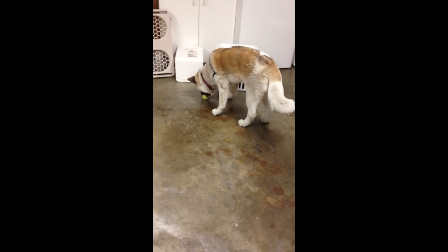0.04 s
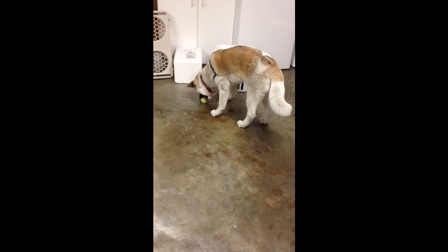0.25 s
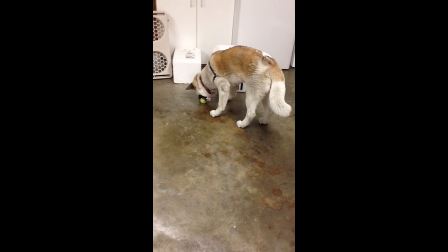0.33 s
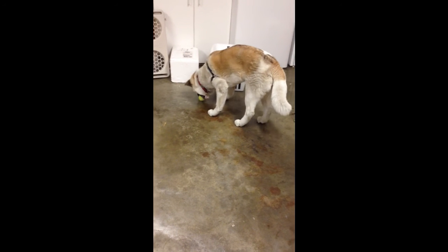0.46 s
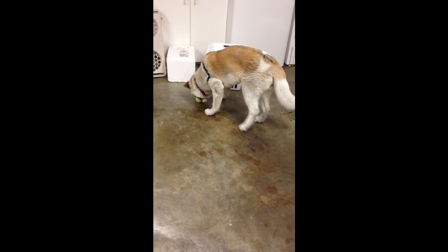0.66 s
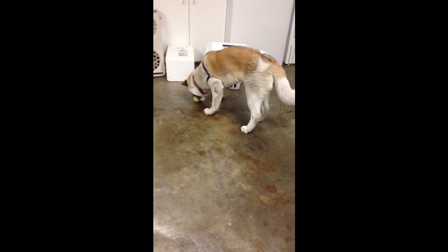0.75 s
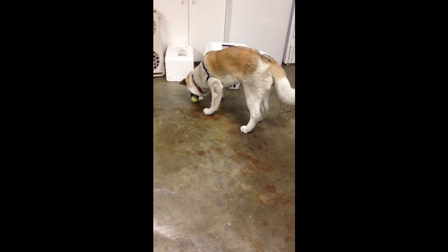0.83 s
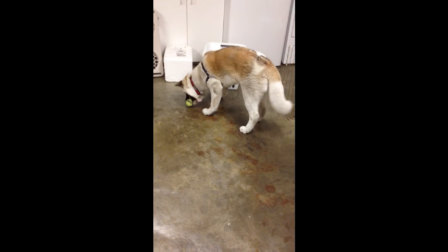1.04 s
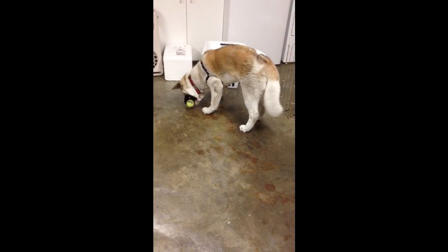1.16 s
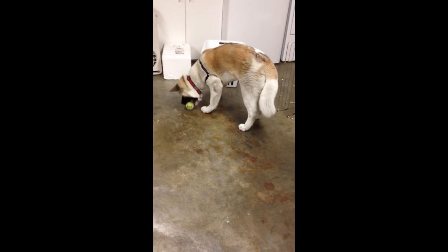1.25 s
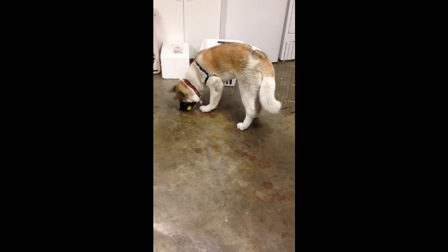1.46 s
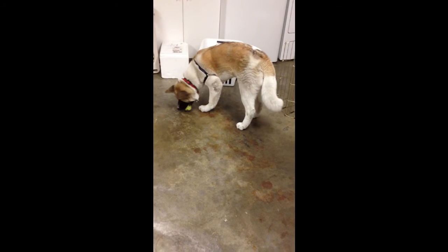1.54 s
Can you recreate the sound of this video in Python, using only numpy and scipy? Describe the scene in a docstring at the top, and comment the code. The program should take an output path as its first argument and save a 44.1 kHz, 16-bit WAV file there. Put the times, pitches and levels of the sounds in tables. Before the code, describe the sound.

Squeaky toy ball chewed by a dog: one short squeak, a longer one that rises and falls, then three quick ones, the fourth loudest. Lively hard room, faint low fan, slight early hiss, distant phone microphone.

```python
"""Five squeaks from a rubber ball a dog bites in a bare hard-floored room, a few metres from a phone.
Each bite drives air through the squeaker reed: a stack of clean overtones whose pitch follows the
pressure, with a little leaking air. The room rings on as filtered noise that dies band by band.
Behind it a fan drones low with a faint hum, and a thin treble hiss with a faint tone fades early."""
import sys
import numpy as np
from scipy import signal
from scipy.fft import rfft, irfft
from scipy.io import wavfile
from scipy.ndimage import uniform_filter1d

SR = 44100
rng = np.random.default_rng(int(sys.argv[2]) if len(sys.argv) > 2 else 0)


def wrap_up_sound(samples):
    """Save the sound to the file named by the first command line argument, as 16-bit audio."""
    columns = np.atleast_2d(samples).T
    # keep every value between -1 and 1, then stretch to whole-number steps
    tamed = np.clip(columns, -1, 1)
    steps = np.round(tamed * 32767).astype(np.int16)
    wavfile.write(sys.argv[1], SR, steps)


def elevation(decibels):
    """Turn decibel levels (scalar or array-like) into linear amplitude ratios."""
    levels = np.asarray(decibels, float)
    return 10 ** (levels / 20)


N = 70560  # samples, 1.6 s


def unit(x):
    """Scale to an rms of 1."""
    return x / np.sqrt(np.mean(x ** 2))


def colour(x, table):
    """Filter by (Hz, dB) points, joined by straight lines over log frequency."""
    hz = np.maximum(np.arange(len(x) // 2 + 1) * SR / len(x), 1)
    f, db = np.array(table, float).T
    return irfft(rfft(x) * elevation(np.interp(np.log(hz), np.log(f), db)), len(x))


def walk(rate):
    """Random levels held 1 / rate s and slewed twice; spread near 1."""
    k = int(SR / rate)
    held = np.repeat(rng.standard_normal(N // k + 1), k)
    return 1.3 * uniform_filter1d(uniform_filter1d(held, k), k)[:N]


def fan(t):
    """Low drone: steady shaped noise plus one hum tone, both wavering slowly in level."""
    # Spectrum of the fan in the room: f/Hz, level/dB per Hz
    fan_spectrum = [(20, -15), (60, -19), (110, -6), (200, 0.5), (320, -1), (550, -4), (1000, -10),
                    (1600, -12.5), (3000, -15), (6000, -19.5), (12000, -27), (16000, -26)]
    drone_db, hum_db, hum_hz = -56, -69.5, 307
    drone = elevation(drone_db + 0.68 * walk(6.2)) * unit(colour(rng.standard_normal(N), fan_spectrum))
    hum = elevation(hum_db + 2.6 * walk(6.4)) * np.sin(2 * np.pi * hum_hz * t)
    return drone + hum


def treble_hiss(t):
    """Thin shaped noise and a faint unsteady tone inside it, both sinking and then gone early."""
    # Spectrum of the hiss: f/Hz, level/dB per Hz
    hiss_spectrum = [(1000, -25), (2000, -19.5), (3600, -12.5), (5200, -21), (7000, -5.5), (7800, 9.5),
                     (11000, -1.5), (14500, -12), (16000, -16)]
    start_db, slope_db_s = -54.46, -25
    ring_hz, ring_db, ring_t60_s = 7780, -48, 0.26
    end_s, fade_s = 0.187, 0.0092  # start and time constant of the final fade
    hiss_level = elevation(start_db + slope_db_s * t + 0.49 * walk(24))
    hiss = hiss_level * unit(colour(rng.standard_normal(N), hiss_spectrum))
    ring_level = elevation(ring_db - 60 * t / ring_t60_s + 2.5 * walk(43.4))
    ring_pitch = ring_hz * (1 + 0.0023 * walk(28))
    ring = ring_level * np.sin(2 * np.pi * np.cumsum(ring_pitch) / SR)
    return (hiss + ring) * np.exp(-np.clip(t - end_s, 0, 1) / fade_s)


def room(x, t):
    """Dense reflections that build up after a gap and die band by band."""
    # Reverberation time of the bare room: f/Hz, T60/s
    decay_times = [(1000, 0.49), (2000, 0.45), (4000, 0.49), (8000, 0.41), (16000, 0.32)]
    # Tint of the reflections: f/Hz, level/dB
    reflection_tint = [(1500, -1), (3000, 0.9), (5000, -3), (9000, 3.3), (15000, 0.5)]
    response_db, gap_s, build_s = 0.96, 0.0013, 0.0064  # energy of the reflections against direct
    f, t60 = np.array(decay_times, float).T
    spec = rfft(rng.standard_normal(N))
    hz = np.arange(N // 2 + 1) * SR / N
    tail = 0
    for mid in 500 * 2 ** np.arange(0, 5.5, .5):  # overlapping half-octave steps
        share = np.clip(1 - 2 * np.abs(np.log2(np.maximum(hz, 1) / mid)), 0, 1)
        band_t60 = np.interp(np.log(mid), np.log(f), t60)
        tail = tail + irfft(spec * share, N) * np.exp(-np.log(1000) * t / band_t60)
    tail = colour(tail, reflection_tint) * np.clip((t - gap_s) / build_s, 0, 1)
    return elevation(response_db) * signal.fftconvolve(x, tail / np.sqrt(np.sum(tail ** 2)))[:N]


def squeaker(t):
    """The reed snaps into clean overtones, wavers a little, and leaks air once a cycle."""
    # Course of each of the five squeaks, one list a bite: t/s, reed pitch f/Hz, level/dB
    squeak_curves = [
        [(.213, 1901, -23), (.24, 1913, -25.5), (.27, 1886, -24.5), (.29, 1828, -23), (.305, 1747, -29.5),
         (.315, 1695, -30.5)],
        [(.4972, 1885, -21.5), (.51, 2107, -24), (.522, 2148, -18.5), (.545, 2166, -23), (.565, 2352, -18.5),
         (.59, 2328, -31.5), (.605, 2266, -18.5), (.62, 2059, -24.5), (.64, 1901, -22.5), (.67, 1789, -30),
         (.692, 1677, -34)],
        [(.928, 1807, -27.5), (.95, 1874, -28), (.97, 1862, -28), (.985, 1813, -24), (1.002, 1686, -32)],
        [(1.0785, 1841, -15.5), (1.09, 1809, -14.5), (1.104, 1806, -20), (1.115, 1754, -18),
         (1.124, 1645, -25.5), (1.132, 1620, -23)],
        [(1.193, 1858, -24.5), (1.21, 1963, -22), (1.23, 1979, -28), (1.25, 1940, -21), (1.27, 1840, -25.5),
         (1.295, 1775, -29.5), (1.31, 1671, -30.5)],
    ]
    # Overtones 1-8, one row a squeak, each squeak with its own balance of overtones: level/dB each
    overtone_levels = [
        [-0.5, -1, -13, -12.5, -10, -7.5, -10.5, -16],
        [0, -2, -11, -9, -6.5, -11.5, -19, -24],
        [2, 0, -11.5, -6.5, -4, -2, -0.5, -7],
        [-8, -3, -15.5, -6.5, -2, -14.5, -13.5, -19],
        [2, -2, -12, -8, -8, -5, -8, -18],
    ]
    attack_s, release_s = 0.00251, 0.0013  # linear rise; time constant of the fall
    scoop, scoop_s = .3, .0008  # the reed starts this share flat and jumps up to pitch
    wobble, flutter_db = 0.0016, 1.33  # share of the pitch; level of each overtone
    dull_db = 1.06  # extra loss per overtone by the end of a squeak, as the pressure drops
    sputter_db = 3  # more flutter of the upper overtones by the end of a squeak
    air_db = -25  # air leaking past the reed, against the overtones
    out = 0
    for curve, tones_db in zip(squeak_curves, overtone_levels):
        s, pitch, db = np.array(curve, float).T
        hz = uniform_filter1d(np.interp(t, s, pitch), size=200) * (1 + wobble * walk(90))
        hz = hz * (1 - scoop * np.exp(-np.clip(t - s[0], 0, 1) / scoop_s))
        phase = 2 * np.pi * np.cumsum(hz) / SR
        rise = np.clip((t - s[0]) / attack_s, 0, 1)
        gate = rise * np.exp(-np.clip(t - s[-1], 0, 1) / release_s)
        spent = np.clip((t - s[0]) / (s[-1] - s[0]), 0, 1) ** 2
        tones = 0
        for k, tone_db in enumerate(tones_db):
            flutter = flutter_db * walk(60.1)
            sputter = sputter_db * spent * min(k / 3, 1) * walk(150)
            level = elevation(tone_db - k * dull_db * spent + flutter + sputter)
            # upper overtones speak later
            tones = tones + level * rise ** (k / 2) * np.sin((k + 1) * phase + k * k)
        tones = tones / np.sqrt(np.sum(elevation(tones_db) ** 2) / 2)
        air = np.diff(rng.standard_normal(N + 1)) * (1 + np.sin(phase))
        out = out + gate * elevation(np.interp(t, s, db)) * (tones + elevation(air_db) * unit(air))
    return out


def scene():
    """Direct squeaks, their room, the fan and the early hiss at the microphone."""
    t = np.arange(N) / SR
    toy = squeaker(t)
    return (toy + room(toy, t) + fan(t) + treble_hiss(t))[None]


def band_limit(x):
    """A steep low-pass at the top of the band."""
    return signal.sosfilt(signal.butter(12, 16800, fs=SR, output="sos"), x)


def record(dry):
    """The phone microphone colours the treble, and a steep low-pass cuts the top."""
    # Response of the microphone: f/Hz, level/dB
    mic_response = [(1000, 0), (2300, -1), (3700, 2.94), (4700, -10), (5600, -3.5), (7300, -0.86),
                    (9200, -1.2), (11000, 1.3), (13200, -4), (14200, -10), (15300, -3.5)]
    top_hz = 15940
    low_pass = signal.ellip(8, .2, 50, top_hz, fs=SR, output="sos")
    heard = signal.sosfilt(low_pass, colour(dry[0], mic_response))
    return band_limit(heard[None])


dry = scene()
out = record(dry)
wrap_up_sound(out)
```